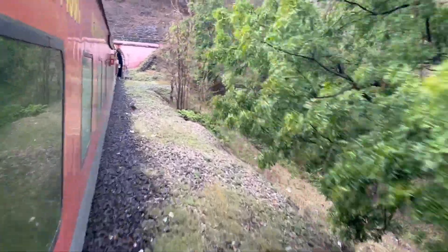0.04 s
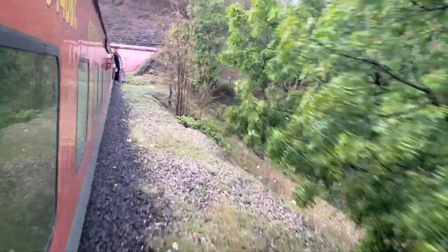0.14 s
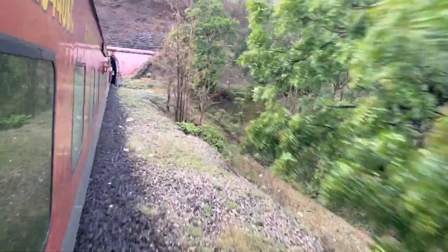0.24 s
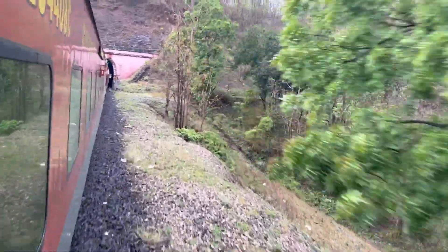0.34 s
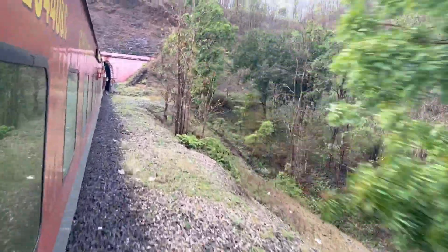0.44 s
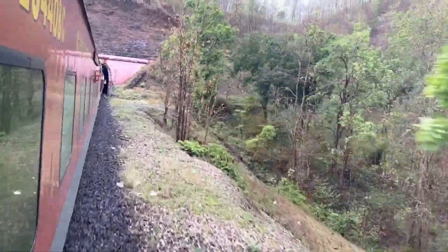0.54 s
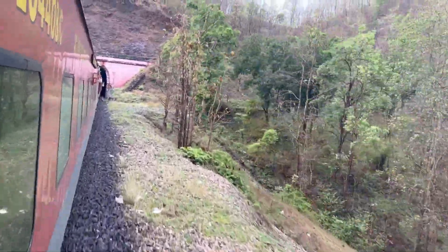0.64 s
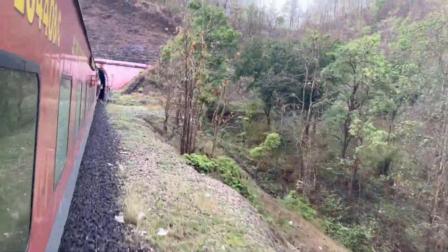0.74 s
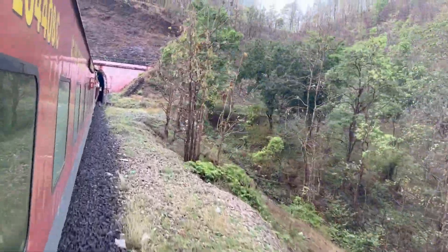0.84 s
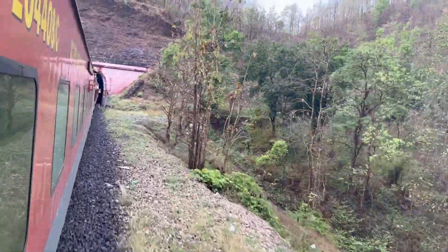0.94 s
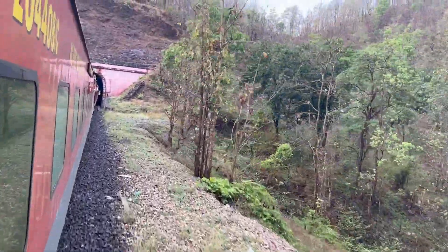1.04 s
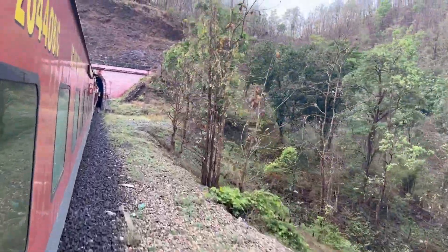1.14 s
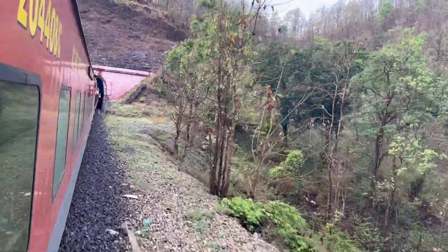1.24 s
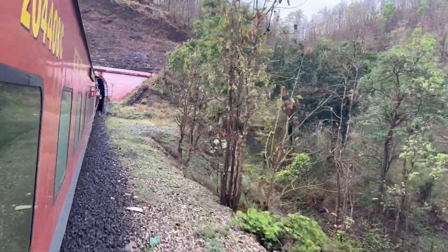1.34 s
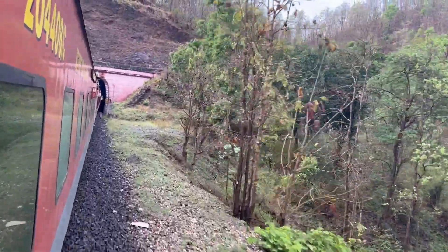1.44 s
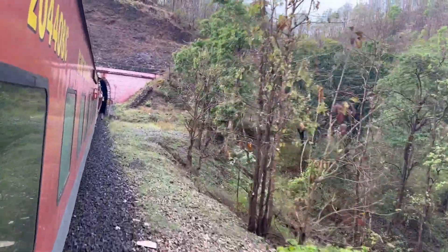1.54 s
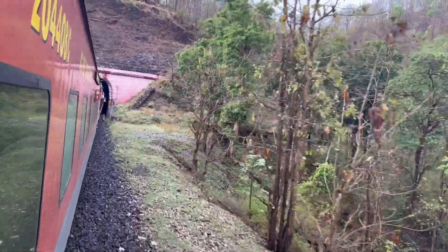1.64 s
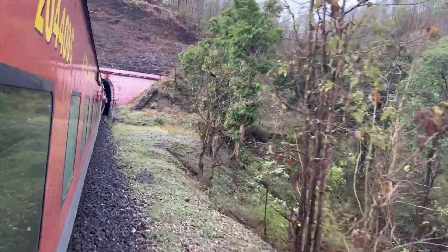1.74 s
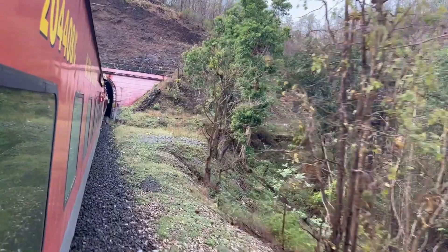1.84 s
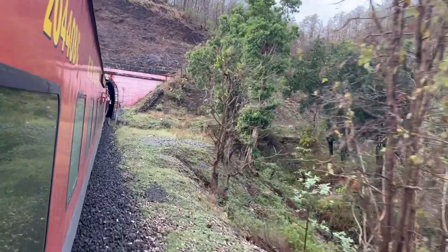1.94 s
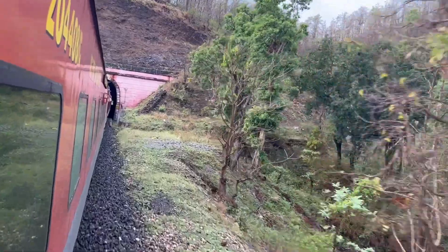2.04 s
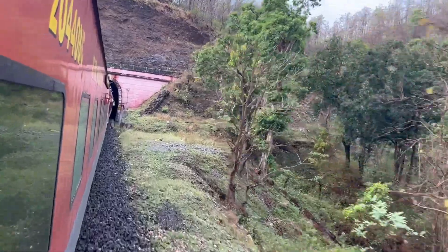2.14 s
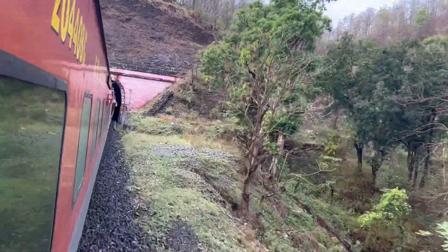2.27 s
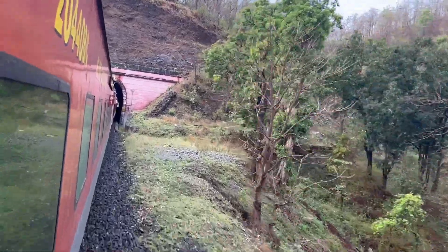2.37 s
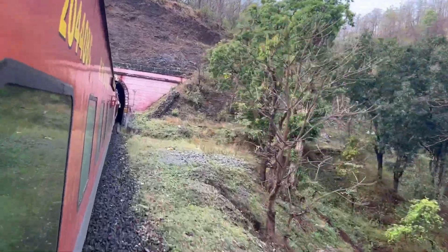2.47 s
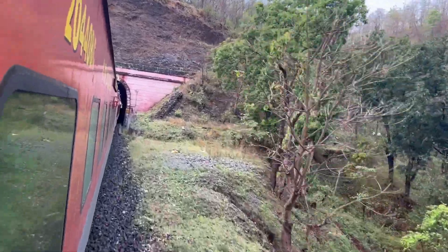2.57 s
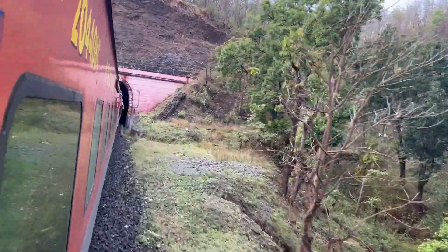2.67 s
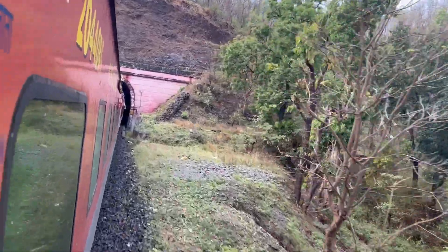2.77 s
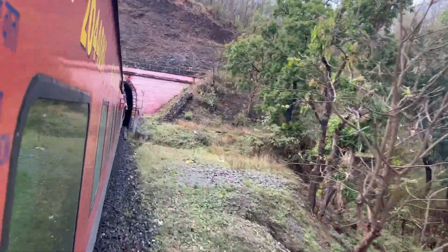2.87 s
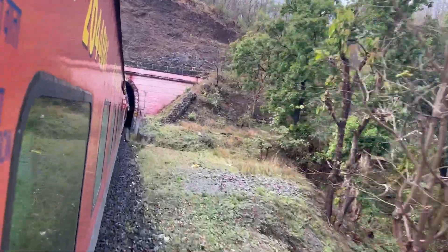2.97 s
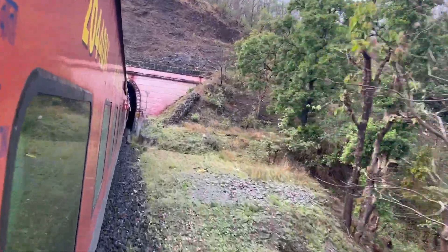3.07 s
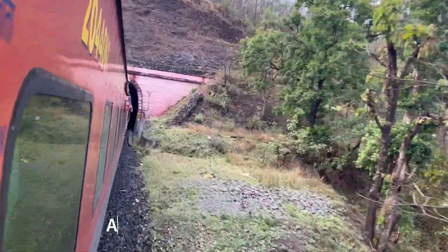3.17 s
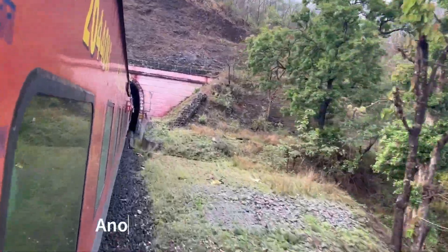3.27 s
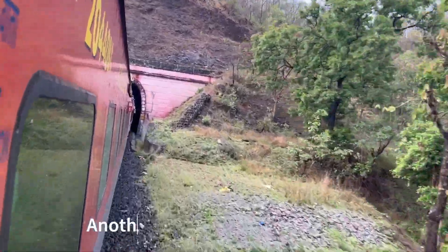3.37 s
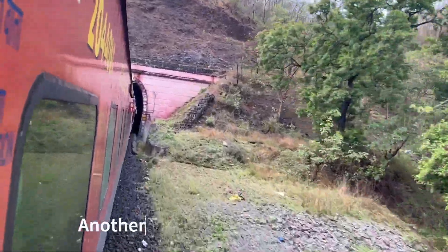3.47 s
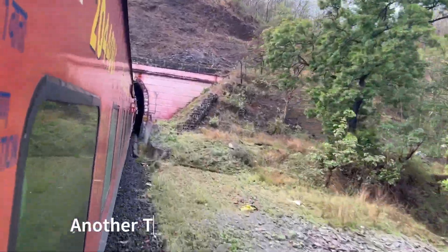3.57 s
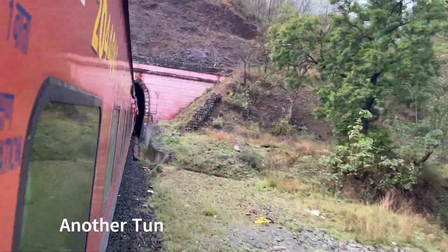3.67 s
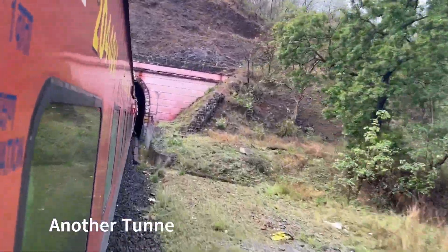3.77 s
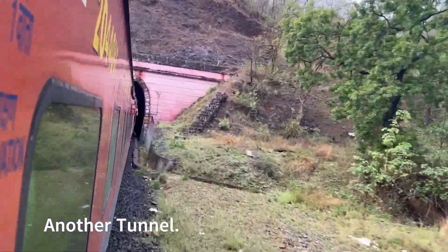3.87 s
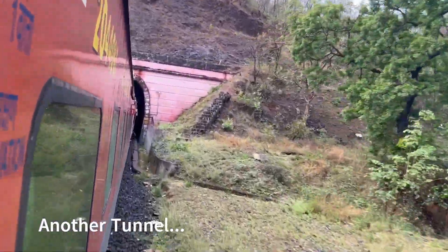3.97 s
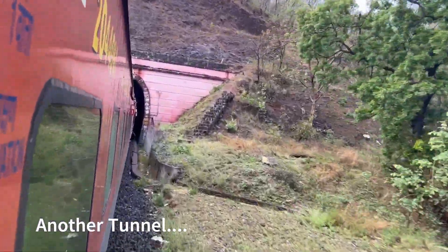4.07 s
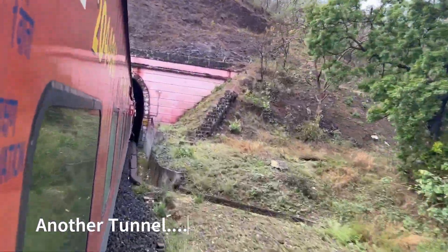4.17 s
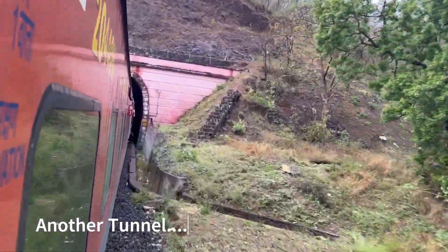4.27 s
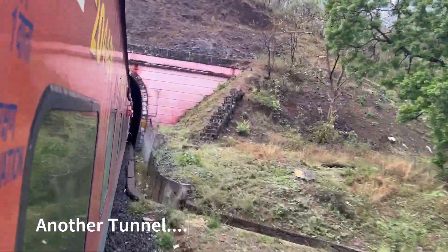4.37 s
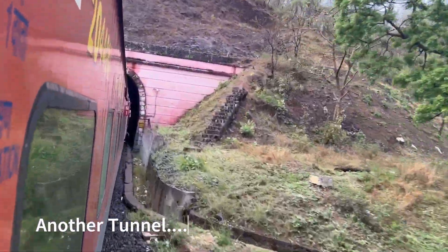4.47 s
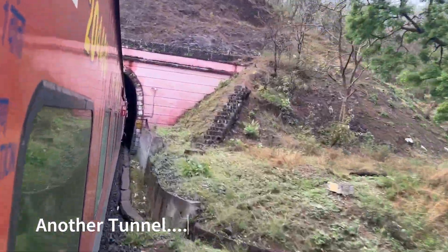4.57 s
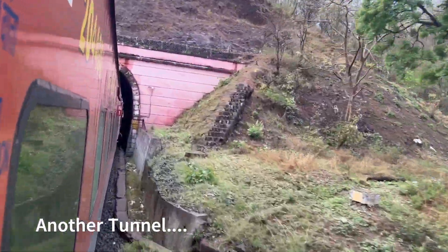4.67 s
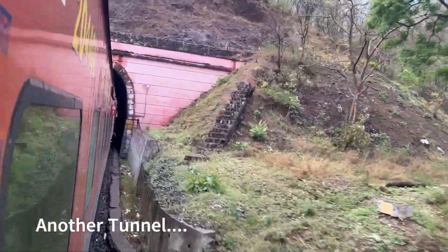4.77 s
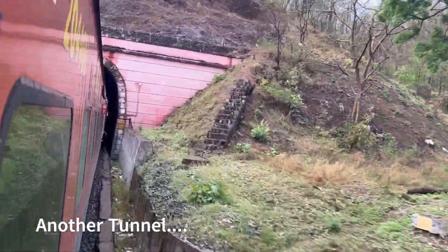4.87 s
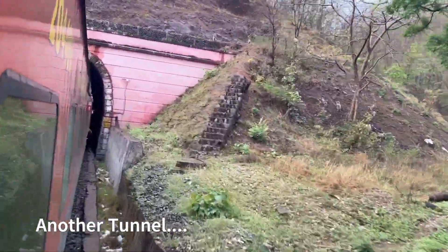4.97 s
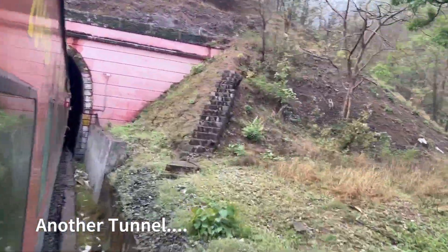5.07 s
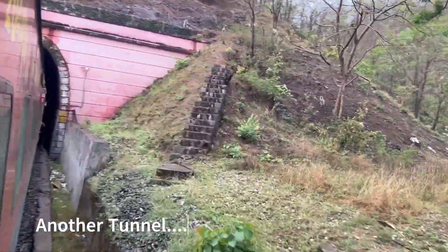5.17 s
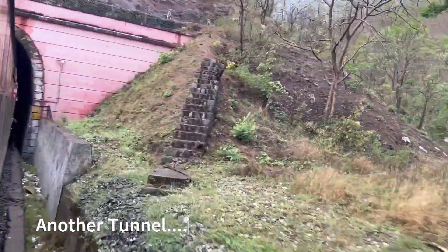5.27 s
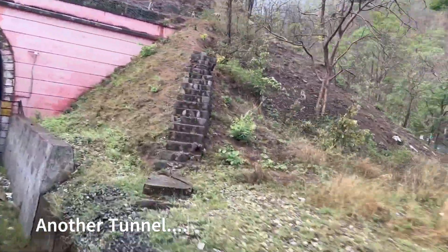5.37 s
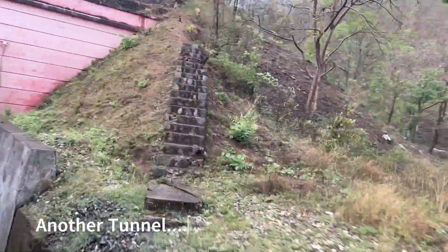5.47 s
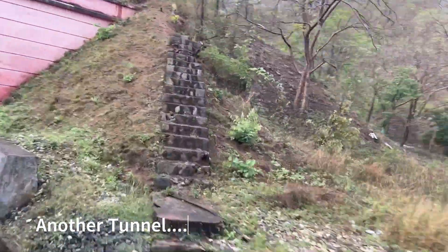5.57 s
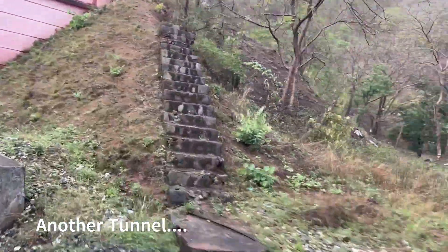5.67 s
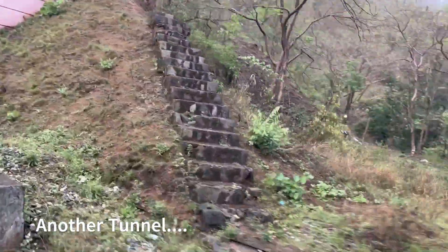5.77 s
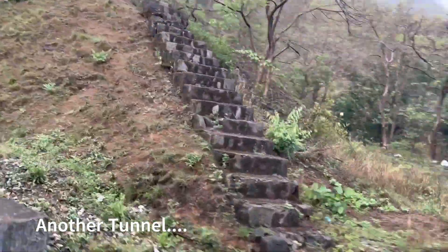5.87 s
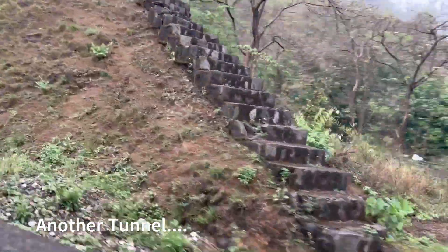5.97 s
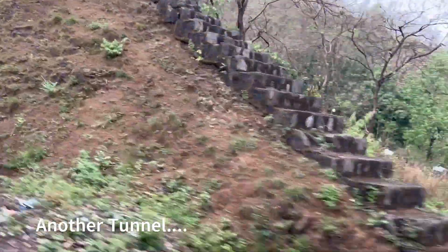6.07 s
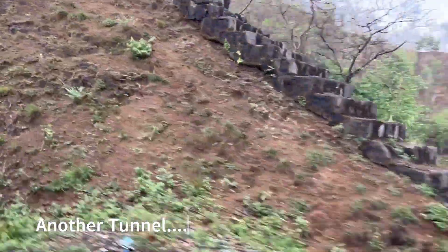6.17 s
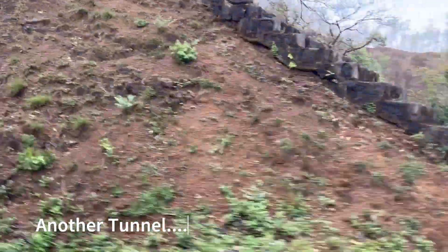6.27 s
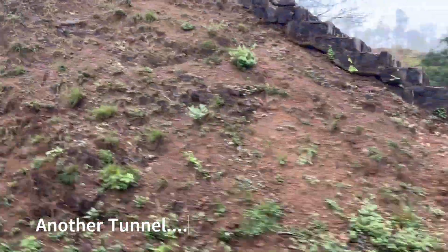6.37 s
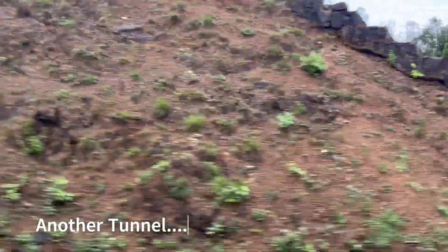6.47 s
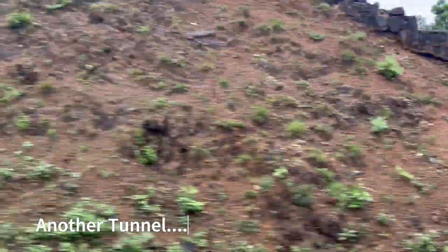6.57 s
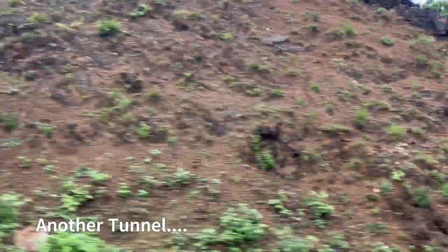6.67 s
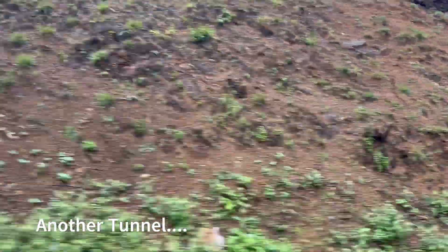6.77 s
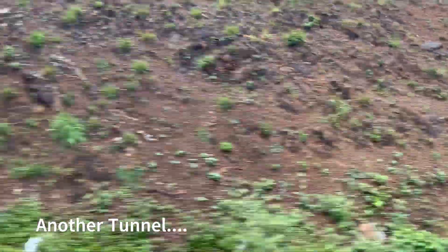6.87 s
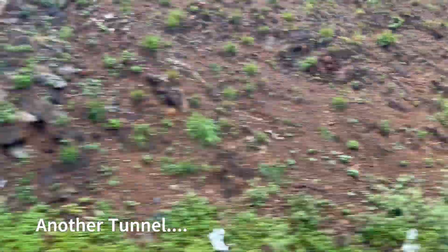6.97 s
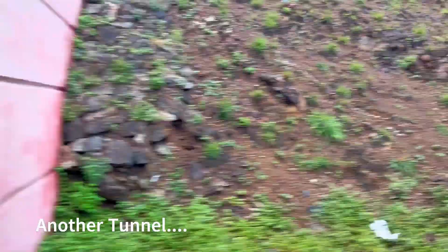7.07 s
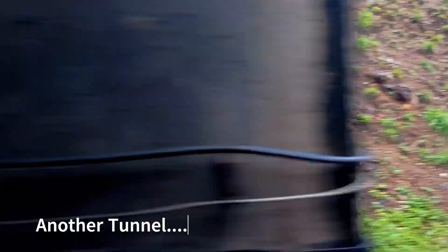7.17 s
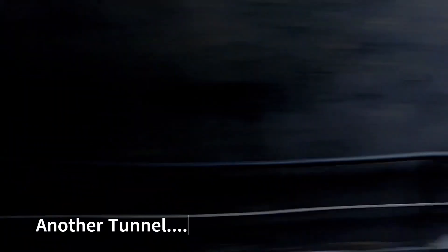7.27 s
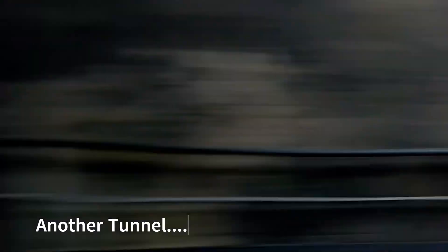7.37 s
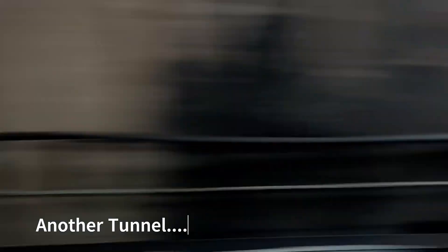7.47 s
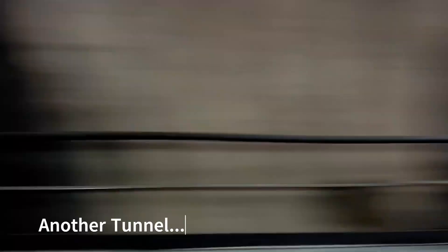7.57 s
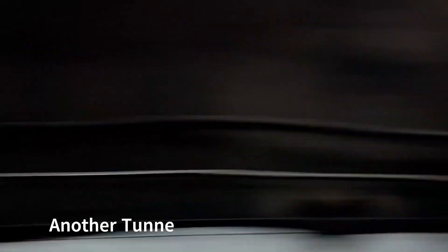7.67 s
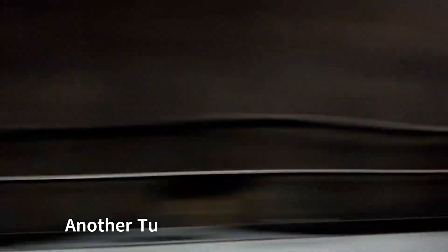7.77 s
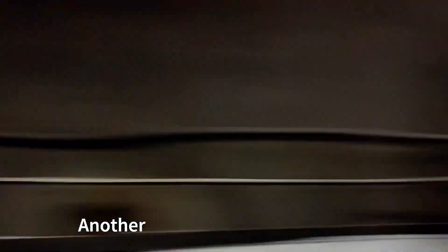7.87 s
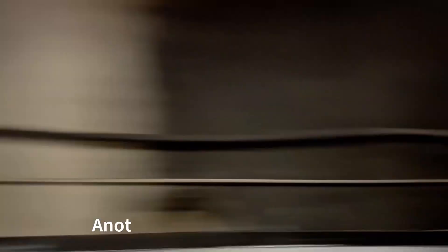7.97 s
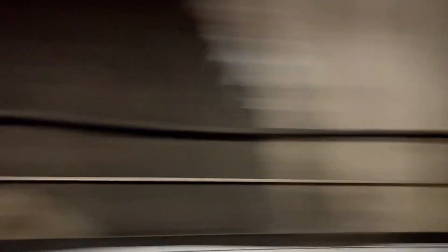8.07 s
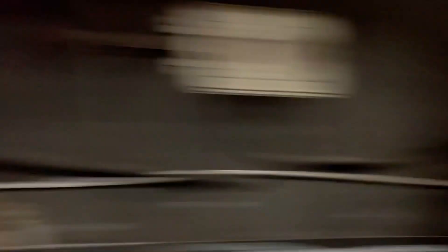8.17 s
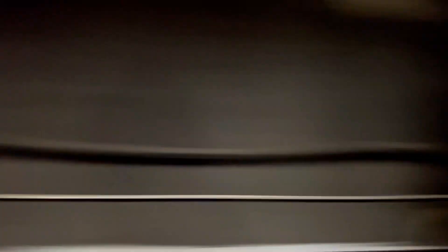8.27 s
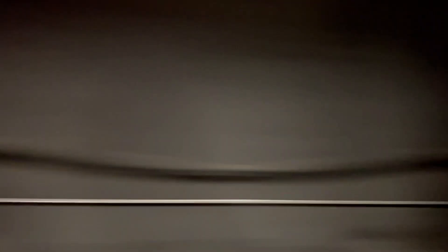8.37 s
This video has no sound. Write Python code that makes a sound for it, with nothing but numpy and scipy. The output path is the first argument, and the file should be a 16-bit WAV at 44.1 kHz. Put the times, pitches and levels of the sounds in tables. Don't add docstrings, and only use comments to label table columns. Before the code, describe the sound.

Blustery gusts slap the microphone above rough rail roar and soft joint knocks; banks throw back the noise, then a tunnel booms around the carriage.

```python
import sys
import numpy as np
from scipy import signal
from scipy.fft import rfft, irfft, next_fast_len
from scipy.io import wavfile
from scipy.ndimage import uniform_filter1d

SR = 44100
rng = np.random.default_rng(int(sys.argv[2]) if len(sys.argv) > 2 else 0)


def invert_db(x):
    u = np.asarray(x, float) / 20
    return 10 ** u


def wrap_up_sound(samples):
    columns = np.atleast_2d(samples).T
    tamed = np.clip(columns, -1, 1)
    steps = np.round(tamed * 32767).astype(np.int16)
    wavfile.write(sys.argv[1], SR, steps)


N = 371753
SIZE = next_fast_len(N)
HZ = np.arange(SIZE // 2 + 1) * SR / SIZE + 1
TIME = np.arange(N) / SR

# (time [s], share of wind replaced by thrown-back roar [0-1], brightness of open cutting [dB])
WALLED = [
    (0, 0.033, -3),
    (5.95, 0.014, -21),
    (6.15, 0.29, 10),
    (6.4, 0.46, -4),
    (6.55, 0.27, 6.5),
    (6.82, 1, -1.5),
    (7.0, 0.76, -2.5),
    (7.2, 1, -6),
    (8.43, 0.91, -10),
]
# (frequency [Hz], width [Hz], level [dB])
BORE_MODES = [(66, 6.4, 2.5), (99, 7.9, -6), (125, 24, 8), (172, 21, -5.5), (340, 170, 7.5),
              (367, 32, -2.5), (473, 13, 3.5), (597, 6.2, -6)]
# (frequency [Hz], level [dB])
ECHO_SPECTRUM = [(40, -32), (90, -13.5), (200, 4), (350, -2.5), (600, -8.5), (800, -13), (1100, -10.5),
                 (2000, -27), (5000, -66)]
# (start [s], length [s], frequency [Hz], wander [Hz], level [dB])
SURGES = [(7.16, .26, 102, 4, -13), (7.05, .12, 140, 10, -17), (7.48, .12, 55, 4, -15),
          (7.38, .08, 128, 5, -12), (7.3, .13, 370, 40, -17), (7.49, .13, 360, 20, -16),
          (7.2, .25, 150, 15, -20), (6.78, .22, 170, 25, -19), (7.65, .11, 68, 4, -13),
          (7.76, .22, 112, 6, -16), (8.06, .1, 70, 6, -14), (8.3, .125, 70, 8, -14),
          (8.3, .12, 150, 20, -18), (7.72, .1, 380, 40, -20), (6.93, .1, 550, 25, -19),
          (7.05, .1, 320, 40, -17), (7.15, .14, 430, 40, -17), (7.27, .1, 260, 30, -17),
          (7.82, .2, 350, 30, -19)]
# (start [s], length [s], centre [Hz], width [Hz], level [dB])
SWELLS = [(4.9, .5, 2650, 200, -44), (5.05, .3, 2350, 200, -47), (5.45, .3, 2650, 150, -48),
          (4.85, .6, 4500, 500, -46), (4.9, .6, 3950, 300, -51), (5.4, .5, 4400, 500, -49),
          (5.1, .3, 3200, 300, -50), (3.035, .05, 1600, 1200, -33), (2.4, .1, 4100, 250, -48),
          (4.28, .17, 2700, 300, -49), (.695, .1, 4900, 750, -44), (1.72, .14, 3000, 2000, -46),
          (7.68, .14, 9000, 6000, -48), (.69, .13, 11800, 5000, -54), (.7, .11, 7000, 3000, -58),
          (6.77, .09, 1000, 1000, -22), (7.8, .4, 1000, 90, -35), (6.85, .75, 750, 350, -27)]

# (time [s], gain [dB])
NEAR_GAIN = [(0, 2.5), (1.15, 0.5), (2.7, 2), (3.5, 3), (4.7, 3), (4.95, 5.5), (5.4, 5), (5.85, 5),
             (6.0, 4.5), (6.3, 7.5), (6.7, 8.5), (7.1, 11), (7.6, 8), (8.43, 7)]
# (frequency [Hz], level [dB])
ROAR_SPECTRUM = [(400, 5), (800, 5), (1100, 0), (1500, -2), (2000, -8), (3000, -8.5), (4500, -20.5),
                 (7000, -42)]
# (frequency [Hz], level [dB])
HISS_SPECTRUM = [(1500, -4.5), (3000, -4), (4600, -2), (5500, -6), (7000, -10.5), (9000, -16), (12000, -40)]
# (frequency [Hz], level [dB])
FIZZ_SPECTRUM = [(4000, -14), (6000, 1), (8000, 4), (10000, 3), (11200, 4), (12500, -2), (14000, -1),
                 (15000, -4), (15700, 4)]
# (frequency [Hz], width [Hz], level [dB])
WHEEL_MODES = [(1526, 53, 10), (1807, 33, 6), (2153, 37, 5.5), (2365, 23, 10), (2675, 50, 7.5),
               (3186, 95, 3.5), (3976, 76, 5), (4690, 1200, -3)]
# (time [s], peak [dB], top part [dB])
CLACKS = [(.069, -32, -16), (.309, -32.5, -20), (.519, -31, -17), (.939, -36, -6), (1.415, -28, -22),
          (1.599, -29, -22), (1.979, -30, -28), (2.17, -37, -5), (2.879, -27.5, -23), (3.609, -30, -14),
          (3.839, -35, -20), (4.045, -26.5, -24), (4.249, -28.5, -27), (4.469, -36, -13),
          (4.629, -29.5, -33), (4.889, -27, -22), (5.079, -26.5, -24), (5.259, -29, -19),
          (6.109, -21.5, -24), (6.279, -20, -22), (6.493, -18.5, -19), (6.719, -18.5, -14),
          (6.799, -19.5, -21), (7.099, -25, -34), (7.349, -20.5, -27), (7.549, -21, -14),
          (7.779, -26.5, -7), (7.959, -30, -9), (8.179, -22, -18)]
# (time [s], peak [dB], top part [dB])
TICKS = [(2.3414, -47, -27), (2.5064, -19, -11), (2.8634, -22.5, -22), (3.045, -24, -20), (3.06, -29, -28),
         (3.4524, -32.5, -43), (3.7694, -30, -18), (4.8044, -43, -29), (6.1474, -38, -23),
         (6.3094, -22, -19), (6.7844, -17.5, -14), (7.0773, -11, -25)]
# (time [s], fade [s], frequency [Hz], level [dB], unsteadiness [ratio])
SINGS = [(2.225, .075, 1600, -34, .2), (2.295, .085, 1600, -34, .2), (2.39, .07, 1590, -40, .5),
         (3.045, .03, 1580, -30, 3), (6.792, .033, 1770, -18, .6), (6.835, .02, 1790, -25, 1),
         (6.8, .035, 3230, -27, .5), (6.79, .035, 2250, -31, 2), (6.81, .03, 2750, -31, 2),
         (7.1, .04, 1770, -30, 1), (7.1, .025, 2350, -32, 1)]
ROAR_DB, HISS_DB = -37, -45
TOP_USUAL_DB, LOW_DB, LOW_TRADE = -23.5, 1.5, 0.78

# (frequency [Hz], level [dB])
DEEP_SPECTRUM = [(22, -32), (32, -30), (45, -2.5), (65, -1), (100, -3), (140, -4.5), (250, -17.5),
                 (500, -42)]
DEEP_DB, BOOM_SHARE, BOOM_ESCAPES_DB = 0.3, 0.67, 13
MOUTH_S, MOUTH_LENGTH_S = 6.96, 0.25
# (middle [s], peak [dB], frequency [Hz])
THUMPS = [(0.169, -18, 92), (0.263, -21, 109), (0.348, -9, 97), (0.478, -17, 71), (0.928, -17, 90),
          (1.018, -12, 93), (1.351, -16, 80), (1.485, -13, 92), (1.554, -18, 89), (1.825, -20, 82),
          (1.926, -19, 100), (1.999, -10, 64), (2.303, -19, 98), (2.37, -11, 97), (2.852, -14, 109),
          (3.112, -11, 69), (3.406, -16, 74), (3.532, -12, 78), (3.715, -12.5, 84), (3.891, -20, 78),
          (3.972, -11, 78), (4.041, -13, 98), (4.439, -16, 79), (4.596, -16, 97), (4.905, -12, 66),
          (5.406, -15, 76), (5.459, -19, 93), (5.618, -16, 82), (5.734, -14, 82), (5.824, -9.5, 79.5),
          (5.877, -15, 84), (6.281, -12, 80.4), (6.389, -12, 82), (6.637, -16, 86)]
THUMP_CYCLES = 0.75

# (frequency [Hz], level [dB])
WIND_SPECTRUM = [(40, -28), (90, -12.5), (180, 2), (400, 0), (650, -7), (1000, -18), (1600, -47.5),
                 (3000, -52), (6000, -60)]
# (time [s], level [dB])
STREAM = [(0, -23), (1.05, -23.5), (1.25, -23), (2.05, -25.5), (2.9, -22.5), (4.6, -24.5), (5.2, -21),
          (5.85, -23), (6.0, -23.5), (6.2, -24.5), (6.47, -26), (6.75, -20), (7.0, -15.5), (7.3, -15.5),
          (7.6, -15), (7.75, -17), (8.43, -16)]
# (end [s], length [s], wind rise [dB], low boom rise [dB])
GUSTS = [(0.18, 0.11, 2.5, -2), (0.26, 0.089, 4, 5.5), (0.348, 0.021, 3, 11), (0.543, 0.044, 3.5, 10),
         (0.68, 0.1, 5, 6), (0.955, 0.077, 4, 7), (1.175, 0.064, 5.5, 6), (1.429, 0.1, 8, 2),
         (1.567, 0.24, 5, 8), (1.981, 0.1, 14, 6), (2.307, 0.072, 9.5, 7), (2.375, 0.097, 2, 7),
         (2.534, 0.047, 2, -4), (2.82, 0.1, 2.5, 5), (3.11, 0.4, 2, 1), (3.492, 0.32, 4, 4.5),
         (3.612, 0.11, 5.5, 1.5), (3.798, 0.064, 6, -7), (3.993, 0.093, 2.5, 5.5), (4.37, 0.33, 4, 3.5),
         (4.532, 0.049, 8.5, 0), (4.93, 0.51, 4.5, -3), (5.355, 0.073, 8.5, -3), (5.48, 0.17, 6.5, 6),
         (5.616, 0.036, 1, 11), (5.76, 0.05, 5, 10), (5.827, 0.084, 3, 10), (5.89, 0.076, 8, 3),
         (6.323, 0.11, 10, 19), (6.43, 0.19, 11, 17)]
COLLAPSE_S, BUILD_POWER = 0.022, 0.53
# (time [s], peak [dB])
RASPS = [(0.34, -29), (1.141, -19), (1.291, -31), (1.974, -12), (2.249, -9), (2.341, -12), (2.766, -28),
         (2.778, -28), (2.981, -27), (3.351, -26), (3.393, -25), (3.432, -24), (3.456, -17), (3.802, -24),
         (4.054, -22), (4.199, -22), (4.806, -12), (4.817, -10), (.943, -26), (3.044, -21), (3.063, -12),
         (4.52, -25), (4.366, -20), (5.307, -13), (5.34, -25), (5.351, -15), (5.373, -18), (5.413, -7),
         (5.473, -23), (5.569, -4), (5.59, -1), (5.644, -11), (5.715, -12), (5.723, -13), (5.795, -18),
         (5.813, -12), (5.858, -10), (5.939, -19), (6.098, -15), (6.224, -3.5), (6.344, -3), (6.783, -1),
         (7.019, -4), (7.078, -24), (7.106, -19), (8.129, -18), (8.402, -13)]
RASP_RISE_S, RASP_FADE_S, RASP_DB = 0.0015, 0.0048, -11.5
# (time [s], peak [dB], centre [Hz])
SLAPS = [(0.11, -8.5, 350), (0.155, -12.5, 365), (0.212, -14, 310), (0.255, -12.5, 260), (0.34, -6.5, 294),
         (0.406, -18, 307), (0.529, -9, 340), (0.605, -13.5, 280), (0.639, -17, 307), (0.707, -11.5, 320),
         (0.883, -17, 241), (0.908, -19, 320), (0.943, -8.5, 340), (0.964, -14, 400), (1.004, -13, 287),
         (1.09, -12, 375), (1.153, -10, 377), (1.251, -13, 292), (1.287, -12, 476), (1.347, -9.5, 320),
         (1.379, -17.5, 358), (1.408, -14, 310), (1.465, -14, 310), (1.528, -8, 362), (1.581, -12.5, 261),
         (1.745, -13, 360), (1.808, -10.5, 350), (1.826, -9.5, 268), (1.905, -11.5, 340), (1.922, -13, 322),
         (1.976, -6.5, 360), (2.153, -11, 384), (2.212, -11.5, 310), (2.25, -4, 424), (2.266, -32, 290),
         (2.289, -10.5, 374), (2.311, -25, 353), (2.347, -9, 350), (2.369, -19, 302), (2.524, -11.5, 260),
         (2.545, -28, 360), (2.668, -14, 350), (2.75, -14, 360), (2.788, -9, 248), (2.81, -17, 270),
         (2.863, -7, 400), (2.928, -24, 240), (2.983, -11, 382), (3.045, -12, 360), (3.083, -10, 306),
         (3.108, -17, 320), (3.176, -15, 388), (3.211, -12.5, 340), (3.351, -8.5, 470), (3.391, -9, 440),
         (3.457, -5.5, 436), (3.473, -11, 416), (3.504, -11, 280), (3.532, -18, 258), (3.579, -21, 350),
         (3.598, -12, 420), (3.615, -12, 360), (3.77, -7.5, 408), (3.806, -15, 250),
              (3.851, -12.5, 305), (3.938, -18, 290), (3.956, -13.5, 404), (3.977, -16, 390),
              (4.003, -13, 390), (4.043, -9.5, 372), (4.122, -8.5, 383), (4.17, -16, 285), (4.235, -9, 280),
              (4.274, -12, 330), (4.299, -13, 274), (4.32, -17, 290), (4.362, -10, 390), (4.489, -9.5, 308),
              (4.518, -10, 310), (4.542, -21, 350), (4.69, -10, 450), (4.744, -26, 310), (4.772, -18, 312),
              (4.814, -6, 410), (4.881, -13, 350), (4.907, -10, 340), (4.925, -29, 384),
              (4.948, -11.5, 350), (5.015, -17, 340), (5.101, -12, 330), (5.171, -17, 360),
              (5.184, -7, 340), (5.307, -3.5, 380), (5.321, -16, 297), (5.337, -7, 360), (5.373, -3.5, 350),
              (5.4, -8, 340), (5.47, -1, 287), (5.571, -3, 454), (5.606, -12, 272), (5.649, -14, 298),
              (5.712, -4, 420), (5.729, -2.5, 457), (5.772, -8, 278), (5.796, -7, 360), (5.816, -5, 440),
              (5.856, -4.5, 462), (5.935, -7.5, 314), (6.108, -6, 460), (6.131, -8.5, 510),
              (6.235, -6.5, 467), (6.303, -10, 413), (6.32, -16, 450), (6.335, -12.5, 358),
              (6.381, -2.5, 380), (6.426, -14, 360), (6.645, -12, 360), (6.739, -7.5, 435),
              (6.793, -0.5, 503), (6.809, -3.5, 357)]
SLAP_PAN_DB, SLAP_SCATTER_DB, SLAP_LEAD_S = -1.5, -0.5, 0.00195

# (frequency [Hz], lead [rad])
LEFT_LEAD = [(30, 0), (500, .3), (750, -.1), (1100, 1), (1500, 3.1), (1700, 6.4), (3200, 7.5), (3900, 6.4),
             (5000, 7.1), (5550, 4.8), (6500, 6.28), (7300, 6.2), (9000, 4), (9700, 3.2), (10500, 2.7),
             (11900, .5), (13500, -.1), (14600, -.9), (15350, -3.0)]
# (frequency [Hz], share [0-1])
ALIKE = [(40, .98), (130, .92), (400, .75), (900, .5), (1400, .15), (1750, .85), (2700, .7), (3800, .45),
         (4400, .65), (5250, .15), (6900, .9), (10000, .94), (13000, .93), (14500, .65), (15300, .95)]
# (frequency [Hz], difference [dB])
LEFT_OVER = [(300, 0), (550, 3), (1000, .5), (1550, -3), (1750, 4.5), (2800, 1), (3500, 2.3), (6000, 1.3),
             (9000, 0)]
TOP_HZ, LIMIT, KNEE = 15720, .95, 6


def read(table):
    hz, value = np.transpose(table)
    return np.interp(np.log(HZ), np.log(hz + 1), value)


def curve(table):
    s, *columns = np.transpose(table)
    return [np.interp(TIME, s, c) for c in columns]


def unit(x):
    return x / np.sqrt(np.mean(x ** 2))


def colour(x, gain):
    return irfft(rfft(x, SIZE) * gain, SIZE)[..., :N]


def peaks(modes):
    return 1 + sum(invert_db(db) / (1 + ((HZ - hz) / (width_hz / 2)) ** 2) for hz, width_hz, db in modes)


def walk(rate_hz):
    k = int(SR / rate_hz)
    held = np.repeat(rng.standard_normal(N // k + 1), k)
    return 1.25 * uniform_filter1d(uniform_filter1d(held, k), k)[:N]


def ports(shape, grain_db=0, grain_hz=40, lumps_db=0):
    out, lumps = 0, walk(grain_hz / 2)
    noise = rng.standard_normal((3, N))
    alike = np.clip(read(ALIKE), 0, 1)
    shared, left, right = rfft(noise, SIZE) * shape
    both = np.sqrt(alike) * shared + np.sqrt(1 - alike) * np.array([left, right])
    for centre in np.log2(30) + np.arange(10):
        band = np.cos(np.pi / 2 * np.clip(np.log2(HZ) - centre, -1, 1)) ** 2
        if (shape * band).max() > shape.max() / 50:
            flicker_db = grain_db * walk(grain_hz) + lumps_db * lumps
            out = out + irfft(both * band, SIZE)[:, :N] * invert_db(flicker_db)
    return unit(out)


def swells():
    out, common, own = np.zeros((2, N)), rng.standard_normal(N), rng.standard_normal((2, N))
    for s, length_s, hz, width_hz, db in SWELLS:
        age = np.arange(int(length_s * SR))
        at = int(s * SR) + age
        edges_hz = (hz - width_hz / 2, hz + width_hz / 2)
        band = signal.butter(2, edges_hz, "bandpass", fs=SR, output="sos")
        grain = unit(signal.sosfilt(band, (common + .6 * own)[:, at]))
        out[:, at] += invert_db(db + 2.5) * np.sin(np.pi * age / len(age)) * grain
    return out


def surges():
    out, drift, flutter = np.zeros(N), walk(30), walk(39.9)
    for k, (s, length_s, hz, wander_hz, db) in enumerate(SURGES):
        age = np.arange(int(length_s * SR))
        chance = k * (N // len(SURGES)) + age
        line = np.sin(2 * np.pi * np.cumsum(hz + wander_hz * drift[chance]) / SR)
        swell = invert_db(db + 2.3 * flutter[chance]) * np.sin(np.pi * age / len(age))
        out[int(s * SR) + age] += swell * line
    return out


def singing():
    out, age = np.zeros(N + SR), np.arange(SR // 2) / SR
    flutter, drift = walk(79), walk(150)
    for k, (s, fade_s, hz, db, unsteady) in enumerate(SINGS):
        part = slice(k * len(age), (k + 1) * len(age))
        fade = (1 - np.exp(-age / .006)) * np.exp(-(age / fade_s) ** 1.5)
        swell = fade * invert_db(db + 4 + 1.6 * flutter[part])
        line = np.sin(2 * np.pi * np.cumsum(hz * (1 + .008 * unsteady * drift[part])) / SR)
        out[int(s * SR):int(s * SR) + len(age)] += swell * line
    return out[:N]


def knocks(table, rise_s, fade_s, low=0, top=0):
    out, age = np.zeros(N + SR), np.arange(SR // 3) / SR
    shape = (1 - np.exp(-age / rise_s)) ** 2 * np.exp(-(age / fade_s) ** 0.7)
    for s, db, top_db in table:
        low_db = LOW_DB - LOW_TRADE * (top_db - TOP_USUAL_DB)
        out[int(s * SR):int(s * SR) + len(age)] += invert_db(db + low * low_db + top * top_db) * shape
    return out[:N]


def struck(bed_db, hit_db, **part):
    clacks = knocks(CLACKS, rise_s=0.007, fade_s=0.055, **part)
    ticks = knocks(TICKS, rise_s=0.001, fade_s=0.0093, **part)
    return np.hypot(invert_db(bed_db), (clacks + ticks) * invert_db(hit_db))


def wheels(roar_db, hiss_db):
    modes = 0.5 + 0.41 * peaks(WHEEL_MODES)
    roar = ports(invert_db(read(ROAR_SPECTRUM)) * modes, grain_db=1.18, grain_hz=30.54, lumps_db=-1.5)
    roar = roar * struck(roar_db + 4.5, -1.9, low=1)
    hiss = ports(invert_db(read(HISS_SPECTRUM)) * modes, grain_db=1.0, grain_hz=35.27, lumps_db=1.5)
    hiss = hiss * struck(hiss_db + 1.3, -7.0)
    fizz = ports(invert_db(read(FIZZ_SPECTRUM)), grain_db=2.0, grain_hz=35.5, lumps_db=0.2)
    fizz = fizz * struck(hiss_db - 7.5, -2.0, top=0.63)
    return roar + hiss + fizz


def rumble(level_db, walled):
    deep = invert_db(read(DEEP_SPECTRUM))
    open_air = ports(deep, grain_db=-0.3, grain_hz=6.0)
    inside = ports(deep * peaks(BORE_MODES), grain_db=2.5, grain_hz=2.86)
    return (np.sqrt(1 - walled) * open_air + np.sqrt(walled) * inside * invert_db(-1.5)) * invert_db(level_db)


def thumps():
    out = np.zeros(N)
    for (s, db, hz), turn in zip(THUMPS, rng.random(len(THUMPS))):
        at = int(s * SR) + np.arange(-SR // 20, SR // 20)
        cycles = (TIME[at] - s) * hz
        out[at] += invert_db(db) * np.exp(-(cycles / THUMP_CYCLES) ** 2) * np.sin(2 * np.pi * (cycles + turn))
    return out


def gusts():
    out = np.zeros((2, N))
    for end_s, length_s, *rise_db in GUSTS:
        build = np.clip(1 + (TIME - end_s) / length_s, 0, 1) ** BUILD_POWER
        collapse = np.clip(1 - (TIME - end_s) / COLLAPSE_S, 0, 1)
        out = np.maximum(out, np.outer(rise_db, build * collapse))
    return out


def eddy(hz, turn, top_hz=1100):
    t = np.arange(SR // 25) / SR
    phase = turn + 0.619 * hz * t + top_hz * 0.00351 * (1 - np.exp(-t / 0.0036))
    swell = (1 - np.exp(-(t / 0.0022) ** 2)) * np.exp(-t * hz / 2.6)
    return swell * np.sin(2 * np.pi * phase)


def wind(gust_db, walled, bright_db):
    lumps = ports(invert_db(read(WIND_SPECTRUM)), grain_db=1.5, grain_hz=70.26, lumps_db=1.6)
    patter = 0
    for hz in (110, 280):
        sizes = invert_db(np.minimum(1.3 * rng.exponential(size=N), 5))
        starts = (rng.random(N) < 40 / SR) * sizes
        sides = invert_db(3.6 * rng.standard_normal(N) * np.array([[1], [-1]]))
        push = eddy(hz, rng.random(), top_hz=701)
        patter = patter + signal.fftconvolve(starts * sides, push[None])[:, :N]
    air = lumps * invert_db(-.8) + unit(patter) * invert_db(-7)
    echo = ports(invert_db(read(ECHO_SPECTRUM)) * peaks(BORE_MODES), grain_db=1.3, grain_hz=25.11)
    slope = unit(colour(echo, np.exp(-(np.log2(HZ / 640) / 0.47) ** 2)))
    echo = (echo + invert_db(bright_db) * slope) / (1 + 0.25 * invert_db(bright_db))
    return (np.sqrt(1 - walled) * air + np.sqrt(walled) * echo) * invert_db(gust_db)


def rasps():
    swell, age = np.zeros(N + SR), np.arange(SR // 25) / SR
    shape = (1 - np.exp(-age / RASP_RISE_S)) * np.exp(-(age / RASP_FADE_S) ** 2)
    for s, db in RASPS:
        swell[int(s * SR):int(s * SR) + len(age)] += invert_db(db + RASP_DB) * shape
    common, own = rng.standard_normal(N), rng.standard_normal((2, N))
    mid = np.exp(-(np.log2(HZ / 900) / 0.8) ** 2)
    return unit(colour(common + 0.17 * own, mid)) * swell[:N]


def slaps():
    out, t = np.zeros((2, N + SR)), np.arange(SR // 25) / SR
    band = signal.butter(3, (200, 1300), "bandpass", fs=SR, output="sos")
    wakes = unit(signal.sosfilt(band, rng.standard_normal((2, N + SR))))
    wake_swell = (1 - np.exp(-t / .004)) * np.exp(-(t / .016) ** 2) * invert_db(-9)
    events = SLAPS
    for (s, db, hz), (turn, side) in zip(events, rng.random((len(events), 2))):
        pan_db = SLAP_PAN_DB + SLAP_SCATTER_DB * (2 * side - 1)
        i = int((s - SLAP_LEAD_S) * SR)
        wake = wakes[:, i:i + len(t)] * wake_swell
        push = eddy(np.clip(hz, 100, 1200), turn, top_hz=750) + wake
        out[:, i:i + len(t)] += push * invert_db(db - 1.5 + np.array([[pan_db], [-pan_db]]) / 2)
    return out[:, :N]


def scene():
    (stream_db,), (near_db,) = curve(STREAM), curve(NEAR_GAIN)
    walled, bright_db = curve(WALLED)
    walled = np.clip(walled, 0, 1)
    gust_db, boom_db = gusts()
    open_sky = np.clip(1 - (TIME - MOUTH_S) / MOUTH_LENGTH_S, 0, 1)
    deep_db = stream_db + DEEP_DB + BOOM_SHARE * boom_db - BOOM_ESCAPES_DB * walled * open_sky
    walls = swells() + surges()
    rail = singing() + wheels(ROAR_DB + near_db, HISS_DB + near_db)
    low_boom = rumble(deep_db, walled)
    air = thumps() + wind(stream_db + gust_db, walled, bright_db) + rasps() + slaps()
    return walls + rail + low_boom + air


def roll_off(x):
    return signal.sosfilt(signal.butter(12, 15720, fs=SR, output="sos"), x)


def record(dry):
    half = np.exp(.5j * read(LEFT_LEAD)) * invert_db(read(LEFT_OVER) / 2)
    x = colour(dry, np.array([half, 1 / half]) * (HZ < TOP_HZ))
    mix = x / (1 + np.abs(x / LIMIT) ** KNEE) ** (1 / KNEE)
    return roll_off(mix)


dry = scene()
out = record(dry)
wrap_up_sound(out)
```